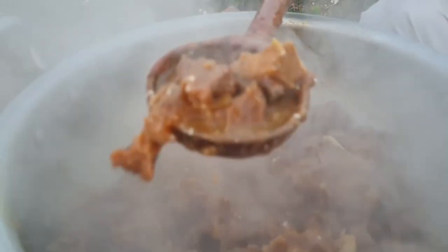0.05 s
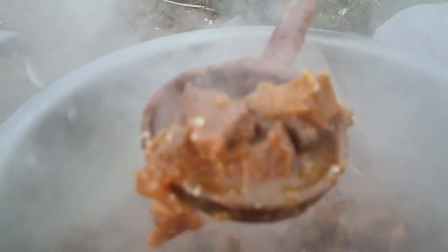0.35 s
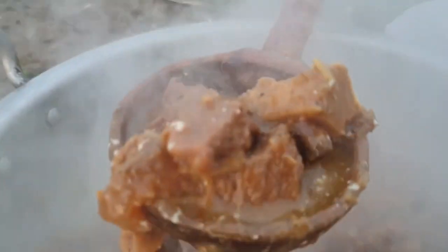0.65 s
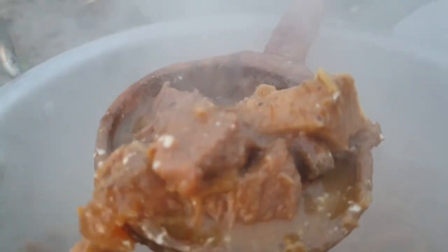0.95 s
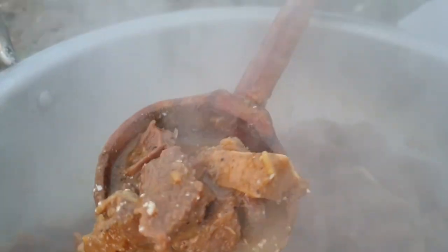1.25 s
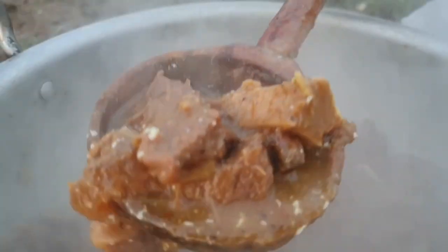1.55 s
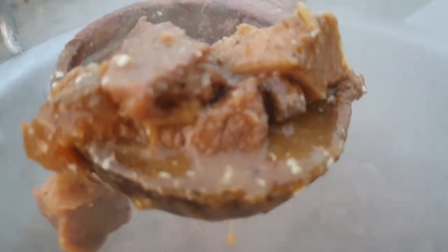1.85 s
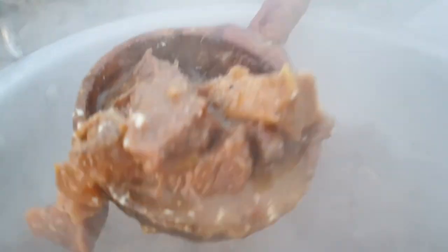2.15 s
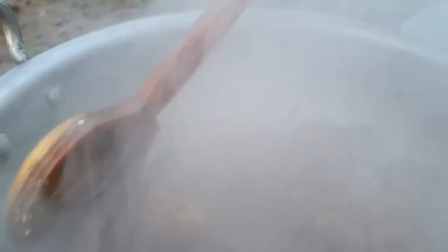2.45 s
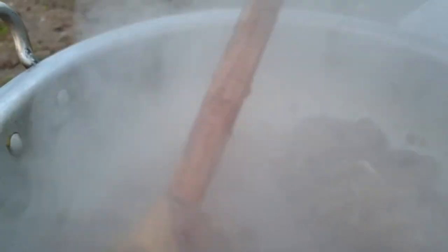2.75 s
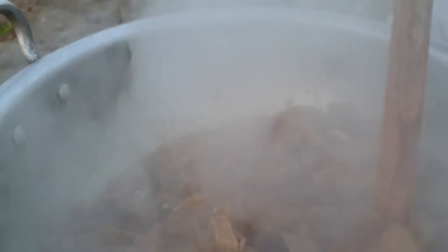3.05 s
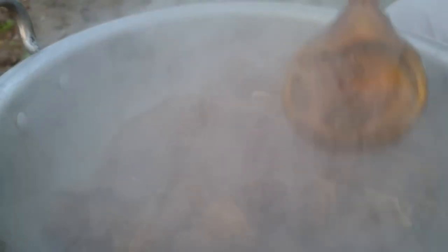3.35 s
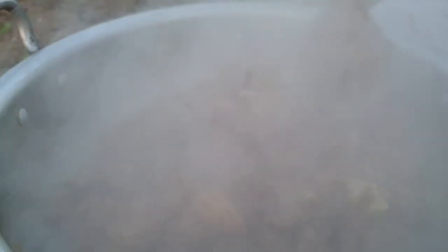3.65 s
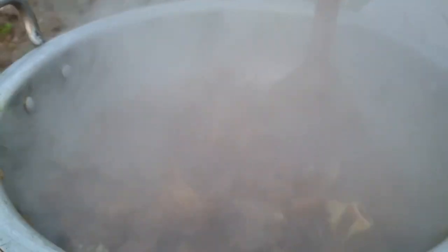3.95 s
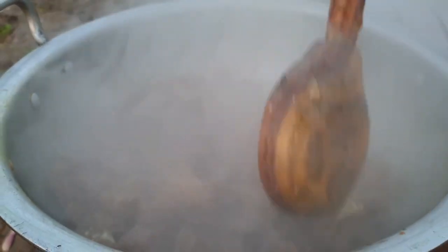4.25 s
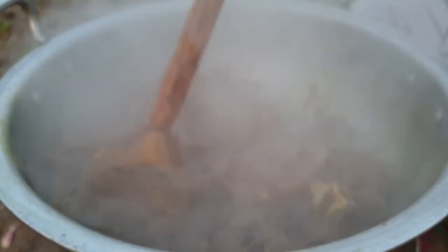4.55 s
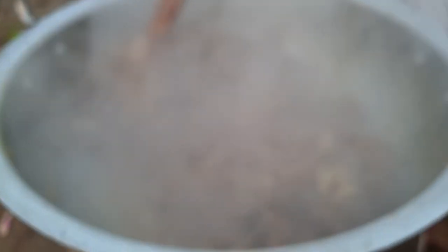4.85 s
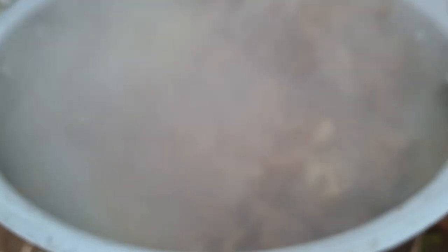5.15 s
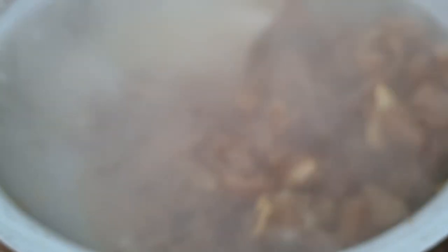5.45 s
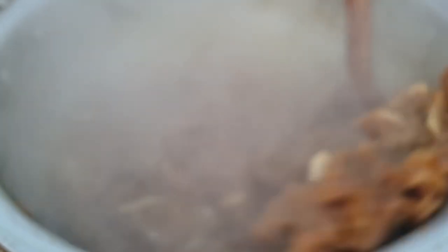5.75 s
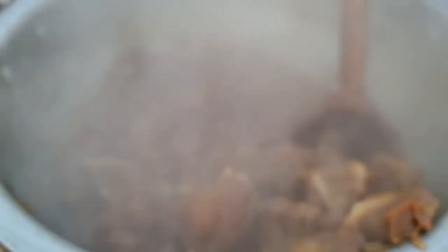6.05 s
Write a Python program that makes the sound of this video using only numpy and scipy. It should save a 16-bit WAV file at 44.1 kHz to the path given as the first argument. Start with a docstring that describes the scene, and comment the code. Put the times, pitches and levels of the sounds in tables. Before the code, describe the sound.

A burner rumbles low throughout under a large metal pot of thick stew, close to the microphone outdoors. At the very start, a few puffs of air thump the left side, and gravy runs off a ladle with a sharp wet snap at about 0.3 seconds. The stew simmers with soft plops, a faint sizzle and small spits of fat. Around 2.5 seconds meat slides softly back in and the bubbling picks up. From 3 seconds a wooden ladle scrapes the wall, then knocks it several times until about 3.8 seconds, dull thuds with a short metallic ring among crackles and plops. The ladle dips in again at 4.5 seconds. From 5 seconds it pushes through the stew with squelches, rasping, fizzing and brief faint metal squeals. Another puff of air and a knock come near 5.5 seconds, and a light ringing knock at 6.

```python
"""Outdoors, microphone close to a big metal pot: thick curry plops and sizzles over a rumbling burner.
First, puffs of air buffet the left port while gravy runs off a wooden ladle and wet films snap.
The stew simmers and spits, then at 2.5 s the ladle tips its meat back in. From 3 s it scrapes along
the wall, knocks the pot and lifts out. It dips in again at 4.5 s and from 5 s ploughs through the stew,
squelching and making the metal squeal, as one more puff catches the microphone."""
import sys
import numpy as np
from scipy import signal
from scipy.fft import rfft, irfft, next_fast_len
from scipy.io import wavfile
from scipy.ndimage import uniform_filter1d, map_coordinates

SR = 44100
rng = np.random.default_rng(int(sys.argv[2]) if len(sys.argv) > 2 else 0)


def wav_record(signal):
    """Record a signal, one row per channel, as 16-bit PCM in the file named by sys.argv[1]."""
    frames = np.transpose(np.atleast_2d(signal))
    bounded = np.clip(frames, -1, 1)
    # unit amplitude maps onto the largest positive 16-bit level
    quanta = np.round(bounded * 32767).astype(np.int16)
    wavfile.write(sys.argv[1], SR, quanta)


N = 268569


def amp(db):
    return 10 ** (np.asarray(db) / 20)


def unit_rms(x):
    return x / np.sqrt(np.mean(x ** 2) + 1e-20)


def along(points, hz):
    """Interpolate (frequency [Hz], value) points on a log axis."""
    freqs, values = np.transpose(points)
    return np.interp(np.log(hz + 1), np.log(freqs + 1), values)


def curves(rows):
    """One value per sample for each column after the time."""
    times, *columns = np.transpose(rows)
    return [np.interp(np.arange(N) / SR, times, column) for column in columns]


def wobble(rate, size=N):
    """A smooth random curve, rate knots a second."""
    knots = rng.standard_normal(int(size * rate / SR) + 4)
    return map_coordinates(knots, [np.arange(size) * rate / SR])


def filtered(x, response):
    """Shape x by a response of frequency."""
    n = x.shape[-1]
    padded = next_fast_len(n + min(n, SR // 2))
    return irfft(rfft(x, padded) * response(np.fft.rfftfreq(padded, 1 / SR)), padded)[..., :n]


def add(track, s, sound):
    """Mix a sound into the track at s seconds."""
    start = max(round(s * SR), 0)
    n = max(min(sound.shape[-1], N - start), 0)
    track[..., start:start + n] += sound[..., :n]


def pan(left_db):
    """Channel gains for a left-right difference."""
    return amp([[left_db / 2], [-left_db / 2]])


# How alike the microphone's two sides are: (frequency [Hz], correlation [0-1])
STEREO_LIKENESS = [(30, 0.86), (130, 0.96), (400, 0.9), (800, 0.71), (1300, 0)]
def coloured(pair, spectrum):
    """Two unrelated signals become stereo of rms 1, alike in the bass and apart in the treble."""
    def response(hz):
        angle = np.arccos(np.clip(along(STEREO_LIKENESS, hz), -1, 1)) / 2
        return amp(along(spectrum, hz)) * [np.cos(angle), np.sin(angle)]

    mid, side = filtered(pair, response)
    return unit_rms(np.array([mid + side, mid - side]))


# The flame under the pot: (time [s], rumble [dB], roar [dB])
FLAME_LEVELS = [(0.25, -42.5, -49), (0.51, -47.5, -41.5), (4.2, -42, -45), (5.16, -40.5, -46.5),
                (5.55, -36.5, -38), (5.66, -40, -54.5), (6.09, -44, -40)]
# Its two spectra: (frequency [Hz], level [dB])
RUMBLE_SPECTRUM = [(32, -25), (45, -7.5), (70, -3), (100, -8), (130, -11), (200, -56)]
ROAR_SPECTRUM = [(60, -42), (95, -6.5), (118, 3.5), (143, 4), (165, -12.5), (320, -23.5), (600, -34.5),
                 (1500, -107)]
def burner():
    """The flame rumbles a little left of centre and roars in the middle."""
    rumble_db, roar_db = curves(FLAME_LEVELS)
    rumble = amp(rumble_db) * coloured(rng.standard_normal((2, N)), RUMBLE_SPECTRUM) * pan(1.7)
    roar = amp(roar_db) * coloured(rng.standard_normal((2, N)), ROAR_SPECTRUM)
    return rumble + roar


# Fat frying at the edge of the gravy: (frequency [Hz], level [dB])
SIZZLE_SPECTRUM = [(3500, -14), (6300, 0), (9000, -10), (14000, -5)]
def sizzle():
    """Countless tiny bubbles at the hot wall merge into a faint hiss that comes and goes."""
    level_db = -67.5 + 1.9 * wobble(0.5)
    return amp(level_db) * coloured(rng.standard_normal((2, N)), SIZZLE_SPECTRUM)


# Air right on the microphone: (time [s], level [dB], pitch [Hz], length [s])
AIR_PUFFS = [(0, -16, 60, 0.018), (0.041, -19.5, 69, 0.037), (0.13, -21, 75, 0.0346),
             (5.516, -26.5, 75.5, 0.069)]
def buffet():
    """Short puffs of air shake the left port."""
    out, t = np.zeros(N), np.arange(SR // 8) / SR
    for s, db, hz, length in AIR_PUFFS:
        swell = np.sin(np.pi * np.minimum(t / length, 1))
        add(out, s, amp(db) * swell * np.sin(2 * np.pi * hz * (t - length / 2)))
    return out * amp([[4], [-16]])


# Decay of the air in the pot: (frequency [Hz], t60 [s])
HOLLOW_DECAY = [(200, 0.03), (2000, 0.079), (10000, 0.05)]
def hollow(x):
    """The air inside the pot answers briefly."""
    hz, t, noise = signal.stft(rng.standard_normal((2, SR // 4)), SR, nperseg=256)
    decay = amp(-60 * t / along(HOLLOW_DECAY, hz)[:, None])
    tail = signal.istft(noise * decay, SR, nperseg=256)[1]
    return signal.fftconvolve(x, tail / np.linalg.norm(tail[0]), axes=1)[:, :N]


# Wet films breaking in the pot: (time [s], level [dB])
FILM_SNAPS = [(0.177, -31), (0.2753, -17), (0.56, -41.5), (0.685, -50), (0.783, -47), (1.318, -41),
              (2.75, -40), (3.3, -20.5), (4.924, -22.5)]
# Their spray: (frequency [Hz], level [dB])
SPRAY_SPECTRUM = [(300, -6), (1500, -7.5), (2700, -2), (6000, 3), (7800, 5.5), (10000, 2), (15500, 1)]
def snaps():
    """A wet film snaps sharply, with a brief spray behind it."""
    out, t = np.zeros((2, N)), np.arange(SR // 12) / SR
    attack = 1 - np.exp(-t / 0.00089)
    decay = np.exp(-t / 0.0014) + 0.085 * np.exp(-t / 0.015)
    for s, db in FILM_SNAPS:
        spray = coloured(rng.standard_normal((2, len(t))), SPRAY_SPECTRUM)
        add(out, s, amp(db) * spray * attack * decay)
    return out


# The ladle's place in the pot: (time [s], wall coupling [dB], top fizz smothered [0-1])
LADLE_PATH = [(2.6, 2, 0.01), (3.06, 16, 0.09), (3.4, -4, 0.17), (3.75, 15.5, 0.8), (4.1, 11, 0.44),
              (4.5, 4, 0.07), (5.06, 12, 0.65)]
def ladle_position():
    """Where the ladle is sets how well it drives the wall and how much treble the stew smothers."""
    return curves(LADLE_PATH)


def spit(hz):
    """A tiny bubble cracks open in a narrow burst of treble."""
    t = np.arange(SR // 30) / SR
    burst = rng.standard_normal((2, len(t))) * np.exp(-t / 0.0026)
    crack = filtered(burst, lambda f: (1 + 2.5j * (f / hz - hz / (f + 1))) ** -2)
    return crack / abs(crack).max()


# Hot fat, a little right of the microphone: (time [s], level [dB], pitch [Hz])
FAT_SPITS = [(2.135, -36.5, 7300), (2.159, -37.5, 5970), (2.321, -36, 5950), (2.338, -41, 6100),
             (2.521, -32.5, 6640), (3.1679, -19.5, 5960), (3.227, -22, 3860), (3.369, -32, 8800),
             (3.499, -32, 4370), (3.69, -32.5, 3900), (3.798, -27, 5100)]
def spits(fizz_db, full_fizz_db=-46.5, open_hz=7260, sink_octaves=1.74):
    """Hot fat spits now and then, and crackles finely as the meat is moved, duller deep in the stew."""
    out = np.zeros((2, N))
    _, smothered = ladle_position()
    for s, db, hz in FAT_SPITS:
        add(out, s, amp(db) * spit(hz))
    crackle_db = -36.5 + 0.99 * np.minimum(fizz_db - full_fizz_db, 0) - 7 * smothered
    crackle_hz = open_hz * 2 ** (-sink_octaves * smothered)
    for i in rng.integers(N, size=330):
        db = crackle_db[i] + 3.5 * rng.normal()
        hz = crackle_hz[i] * np.exp(0.28 * rng.normal())
        add(out, i / SR, amp(db) * spit(hz))
    return out * pan(-3.1)


def plop(hz):
    """A bubble's cavity rings for two or three cycles, the gravy slumps, and smaller pockets collapse."""
    t = np.arange(SR // 30) / SR

    def cavity(delay, pitch, damping):
        cycles = pitch * np.maximum(t - delay, 0)
        envelope = (damping * cycles * np.exp(1 - damping * cycles)) ** 2  # soft start, quick death
        return np.sin(2 * np.pi * (cycles + rng.random())) * envelope

    slump = cavity(0, 380 * np.exp(0.088 * rng.normal()), damping=1.28)
    pockets = sum(cavity(0.00806 * rng.random(), 1050 * np.exp(0.392 * rng.normal()), damping=0.55)
                  for _ in range(3))
    return cavity(0, hz, damping=0.94) + 0.43 * slump + 0.17 * pockets


# Bubbles bursting at the surface, near centre: (time [s], level [dB], pitch [Hz])
BIG_BUBBLES = [(0.011, -34.5, 398), (1.315, -41.5, 560), (1.826, -42.5, 746), (2.049, -37.5, 530),
               (2.108, -41, 840), (2.199, -39, 480), (2.329, -40.5, 820), (2.427, -36, 600),
               (2.591, -42.5, 510), (2.626, -28, 1520), (2.633, -35.5, 720), (2.73, -36, 625),
               (2.865, -36, 841), (3.431, -28, 745), (3.436, -27.5, 1140), (3.522, -30.5, 630),
               (3.547, -35.5, 680), (3.589, -31.5, 880), (4.016, -25.5, 780), (4.528, -35.5, 1060),
               (4.558, -34.5, 1170), (4.897, -39, 720), (4.961, -40.5, 720), (5.322, -28.5, 1320),
               (5.937, -35.5, 605), (6.003, -37.5, 554), (6.066, -31, 835)]
# Strings of bubbles squeezed through the gravy:
# (time [s], length [s], level [dB], first pitch [Hz], last pitch [Hz])
BUBBLE_STRINGS = [(1.698, 0.084, -48, 724, 900), (2.468, 0.052, -39, 810, 1230),
                  (2.529, 0.038, -42, 1010, 650), (2.912, 0.068, -37, 820, 1540),
                  (5.7, 0.22, -39, 545, 911)]
def plops(squelch_db, step_s=0.013):
    """Big bubbles burst singly or in gliding strings; small ones grow louder as the stew is disturbed."""
    out = np.zeros((2, N))
    for s, db, hz in BIG_BUBBLES:
        add(out, s, amp(db) * plop(hz) * pan(rng.normal(0.5, 2.1)))
    for i in rng.integers(N, size=180):
        db = min(squelch_db[i], -59) + 9 + 3 * rng.normal()
        hz = 750 * np.exp(0.45 * rng.normal())
        add(out, i / SR, amp(db) * plop(hz) * pan(rng.normal()))
    for s, length, db, first_hz, last_hz in BUBBLE_STRINGS:
        for delay in np.arange(0, length, step_s):
            hz = first_hz * (last_hz / first_hz) ** (delay / length)
            onset = s + delay + step_s * (rng.random() - 0.5)
            add(out, onset, amp(db + 2 * rng.normal()) * plop(hz) * pan(rng.normal()))
    return out


# Metal singing, dead centre: (time [s], length [s], level [dB], lower tone [Hz], upper tone [Hz])
METAL_SQUEALS = [(3.013, 0.16, -46.5, 2912, 3402), (4.723, 0.14, -57.5, 1520, 2051),
                 (5.235, 0.069, -42, 1203, 1560), (5.62, 0.17, -45, 1662, 2270),
                 (5.749, 0.15, -44, 890, 1400)]
def squeals():
    """Two slightly wavering tones swell and fade as the ladle drags over the metal."""
    def tone(hz, n):
        return np.sin(2 * np.pi * np.cumsum(hz + 24 * wobble(120, size=n)) / SR)

    out = np.zeros(N)
    for s, length, db, lower_hz, upper_hz in METAL_SQUEALS:
        n = int(length * SR)
        add(out, s, amp(db) * np.hanning(n) * (tone(lower_hz, n) + 0.5 * tone(upper_hz, n)))
    return out


# Modes of the metal wall: (frequency [Hz], level [dB], t60 [s])
WALL_MODES = [(542, -5, .45), (738, -4, .27), (873, -6, .3), (939, -5, .33), (1122, -11, .22),
              (1655, -6, .16), (2070, -9, .2), (2271, -11, .13), (2372, -8, .14), (2913, -5, .16),
              (3408, -6, .11), (5125, -11, .09)]
def rubbed_wall(rub):
    """The wall rings in its modes under steady rubbing."""
    def resonance(f, hz, t60):
        width_hz = np.log(1000) / np.pi / t60
        return 1j * f * width_hz / (hz * hz - f * f + 1j * f * width_hz)

    return filtered(rub, lambda f: sum(amp(db) * resonance(f, hz, t60) for hz, db, t60 in WALL_MODES))


def struck_wall(t, focus_hz, reach_octaves):
    """A blow rings the wall, favouring modes near focus_hz; moving gravy unsettles each mode's phase."""
    hz, db, t60 = np.transpose(WALL_MODES)[:, :, None]
    share = 0.5 * reach_octaves + np.exp(-(np.log2(hz / focus_hz) / reach_octaves) ** 2)
    slosh = 0.00033 * np.cumsum(rng.standard_normal((len(hz), len(t))), axis=1)
    phase = rng.random((len(hz), 1)) + slosh
    modes = share * amp(db - 60 * t / t60) * np.sin(2 * np.pi * (hz * t + phase))
    return modes.sum(axis=0) * (1 - np.exp(-t / 0.0004))


# Ladle against pot: (time [s], thud [dB], thud top [Hz], thud t60 [s], ring [dB], ring focus [Hz])
LADLE_KNOCKS = [(3.166, -39.5, 2490, 0.27, -34.5, 1460), (3.274, -29, 4150, 0.062, -23, 1660),
                (3.604, -18.5, 4430, 0.014, -32.5, 944), (3.662, -22, 1830, 0.018, -37, 945),
                (3.732, -32.5, 1150, 0.14, -33.5, 640), (3.783, -37, 4370, 0.046, -30.5, 1130),
                (5.568, -24, 4300, 0.013, -49, 2260), (6.029, -38.5, 2317, 0.11, -30.5, 1680)]
def knocks():
    """Each blow is a dull wooden thud; the spot it hits sets its depth and which wall modes ring."""
    out, t = np.zeros((2, N)), np.arange(SR // 2) / SR
    attack = 1 - np.exp(-t / 0.00085)  # gravy cushions the contact
    for s, thud_db, top_hz, t60, ring_db, focus_hz in LADLE_KNOCKS:
        wood = [(focus_hz / 9, -14), (focus_hz / 3.1, 0),
                (top_hz, -7), (top_hz * 2.4, -24), (top_hz * 3, -40)]
        thud = coloured(rng.standard_normal((2, len(t))), wood) * amp(-60 * t / t60) * attack
        # a longer, sliding contact spreads over more modes
        ring = struck_wall(t, focus_hz, reach_octaves=0.11 + 2.0 * t60)
        add(out, s, amp(thud_db) * thud + amp(ring_db) * ring)
    return out


# The stew left to itself: (time [s], liveliness [dB])
BOIL_LIVELINESS = [(.3, 1.5), (.8, -1), (1.8, 3.5), (3.6, 8), (4.3, -0.5), (4.5, 3.5)]
# Pushes of the ladle: (time [s], rise [s], hold [s], fade [dB/s], squelch [dB], rasp [dB], fizz [dB],
# contact resonance [Hz], resonance height [dB])
LADLE_STROKES = [ (0, 0.0017, 0.044, 97, -44, -44, -43.5, 1500, 4),
                 (2.45, 0.023, 0.18, 36, -60.5, -54, -50.5, 1330, 2.5),
                 (2.899, 0.037, 0.015, 85, -47, -47.5, -44.5, 1430, 10),
                 (3.01, 0.031, 0.075, 96, -44, -41, -40, 3280, 8.5),
                 (3.126, 0.025, 0.2, 88, -55.5, -44.5, -42.5, 1520, 0),
                 (3.762, 0.024, 0.017, 296, -43.5, -38, -35, 2440, -1.5),
                 (3.813, 0.14, 0.012, 108, -67, -45.5, -47.5, 1630, -10.5),
                 (4.492, 0.072, 0.005, 280, -56.5, -46, -42.5, 1190, 4.5),
                 (4.595, 0.38, 0.04, 100, -63.5, -58, -49.5, 1590, 1),
                 (5.039, 0.013, 0.16, 69, -48.5, -43.5, -33, 2280, -1),
                 (5.07, 0.028, 0.035, 255, -45.5, -34.5, -38, 2130, 6.5),
                 (5.241, 0.015, 0.016, 42.5, -44.5, -39, -33, 1334, 16),
                 (5.507, 0.14, 0.024, 87, -46.5, -37, -36, 1754, 9),
                 (5.683, 0.04, 0.15, 67, -45.5, -42.5, -39.5, 1350, 6.5),
                 (6.008, 0.018, 0.076, 93, -51, -42.5, -42, 1610, 5.5)]
def stew_activity(sag_octaves_per_s=0.84):
    """Each push rises, holds and fades over the simmer; the strongest rasp leads the resonance."""
    s, rise, hold, fade, squelch, rasp, fizz, hz, height = np.transpose(LADLE_STROKES)[:, :, None]
    t = np.arange(0, N / SR, 0.002)
    since_peak = t - s - rise
    push = np.clip((t - s) / rise, 0, 1) * amp(-fade * np.maximum(since_peak - hold, 0))
    boil_db = np.interp(t, *np.transpose(BOIL_LIVELINESS))

    def level_db(stroke_db, simmer_db):
        return 10 * np.log10(((push * amp(stroke_db)) ** 2).sum(axis=0) + amp(simmer_db) ** 2)

    squelch_db = level_db(squelch, simmer_db=-72.5 + 2.95 * boil_db)
    rasp_db = level_db(rasp, simmer_db=-66 + 0.7 * boil_db)
    fizz_db = level_db(fizz, simmer_db=-69.5 + boil_db)
    weight = (push * amp(rasp)) ** 2 + 1e-20
    sag = 2 ** (-sag_octaves_per_s * np.clip(since_peak, -rise, hold + rise))  # the ladle digs in
    centre_hz = (weight * hz * sag).sum(axis=0) / weight.sum(axis=0)
    height_db = (weight * height).sum(axis=0) / amp(rasp_db) ** 2
    return curves(np.transpose([t, squelch_db, rasp_db, fizz_db, centre_hz, height_db]))


def grit(rate, spread_db, hiss):
    """Tiny slips and pops of uneven size, rate a second, on a smooth hiss."""
    pops = (rng.random((2, N)) < rate / SR) * rng.choice([-1, 1], (2, N))
    sizes = amp(spread_db * np.minimum(rng.exponential(size=(2, N)), 4))
    return unit_rms(pops * sizes) + hiss * rng.standard_normal((2, N))


def contact_resonance(x, centre_hz, height_db, width_octaves=0.29, overtone=3.17, patchy_db=3.0):
    """The resonance and its overtone glide; pockets between the lumps briefly colour the sound."""
    hz, t, frames = signal.stft(x, SR, nperseg=512)
    now = np.minimum((t * SR).astype(int), N - 1)

    def bump(peak_hz):
        return np.exp(-(np.log2((hz[:, None] + 1) / peak_hz) / width_octaves) ** 2 / 2)

    contact_db = height_db[now] * (bump(centre_hz[now]) + 0.39 * bump(overtone * centre_hz[now]) - 0.5)
    patches = uniform_filter1d(rng.standard_normal(frames.shape[1:]), size=5, axis=0)
    pockets = unit_rms(uniform_filter1d(patches, size=6, axis=1))
    return signal.istft(frames * amp(contact_db + patchy_db * pockets), SR, nperseg=512)[1][:, :N]


# Gravy, wood and wet meat at close range: (frequency [Hz], level [dB])
SQUELCH_SPECTRUM = [(120, 3.5), (400, 3.5), (600, -3.5), (900, -2.5), (1200, -34), (2500, -64)]
RASP_SPECTRUM = [(500, -7.5), (900, 8), (2200, 7.5), (3100, 1.5), (4000, -33), (7000, -65)]
FIZZ_SPECTRUM = [(2000, -40), (3200, -5), (4200, 0), (6000, -2), (11000, -6), (15500, -8)]
def stirring(squelch_db, rasp_db, fizz_db, centre_hz, height_db):
    """Gravy squelches, wood rasps on the wall and sets it ringing, and wet meat fizzes on hot metal."""
    wall_db, smothered = ladle_position()
    squelch_gain = amp(squelch_db + 2.0 + 2.1 * wobble(40))
    squelch = squelch_gain * coloured(grit(rate=200, spread_db=-3.0, hiss=0.53), SQUELCH_SPECTRUM)
    slip_db = 0.4 * wobble(45)  # the ladle catches and slides
    rasp_gain = amp(rasp_db - 4.5 + slip_db + 0.64 * wobble(70))
    rasp = rasp_gain * coloured(grit(rate=760, spread_db=0.5, hiss=0.92), RASP_SPECTRUM)
    fizz_gain = amp(fizz_db - 5.5 + slip_db) * pan(-2.5)
    fizz = fizz_gain * coloured(grit(rate=500, spread_db=2.0, hiss=1.0), FIZZ_SPECTRUM)
    fizz -= smothered * filtered(fizz, lambda hz: 1 / (1 + (7500 / (hz + 1)) ** 4))
    rub = contact_resonance(squelch + rasp + fizz, centre_hz, height_db)
    return rub + amp(wall_db) * rubbed_wall(rub)


def scene():
    """Bubbles, spits and blows sound in the hollow of the pot, along with the stirring and the flame."""
    squelch_db, rasp_db, fizz_db, centre_hz, height_db = stew_activity()
    bubbles = plops(squelch_db)
    cracks = spits(fizz_db) + snaps() + knocks()
    ladle = stirring(squelch_db, rasp_db, fizz_db, centre_hz, height_db)
    pot_air = hollow(amp(-8.5) * bubbles + amp(-6.5) * cracks)
    return bubbles + cracks + pot_air + ladle + sizzle() + squeals() + burner() + buffet()


def record(dry):
    """The highest treble is cut off steeply above about 16 kHz."""
    top_hz = 15850
    return filtered(dry, lambda hz: 1 / (1 + (hz / top_hz) ** 120))


dry = scene()
out = record(dry)
wav_record(out)
```